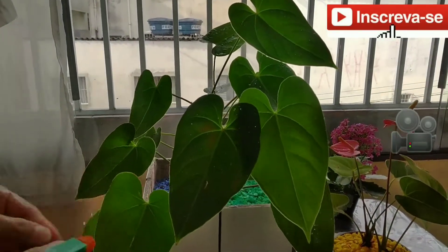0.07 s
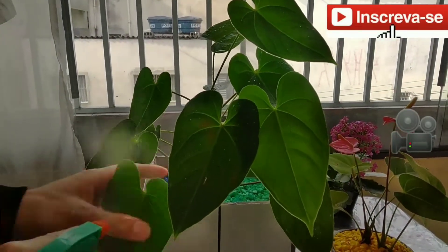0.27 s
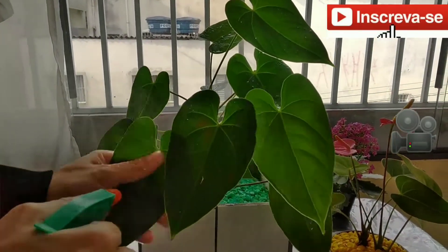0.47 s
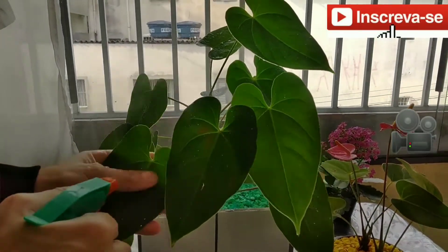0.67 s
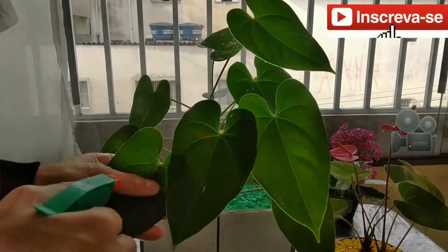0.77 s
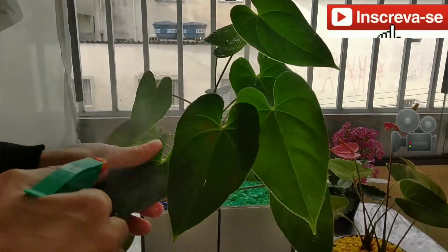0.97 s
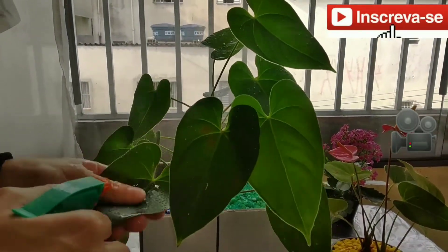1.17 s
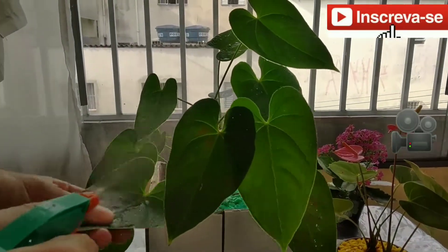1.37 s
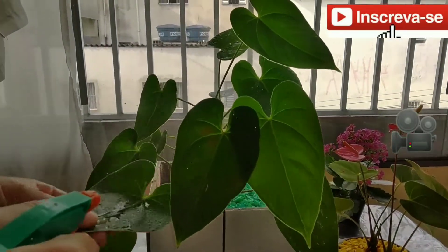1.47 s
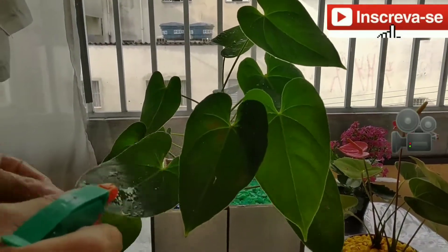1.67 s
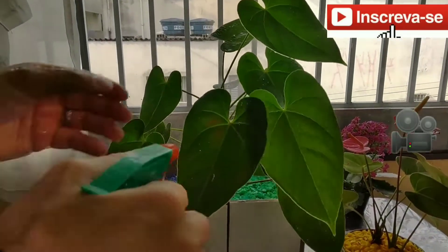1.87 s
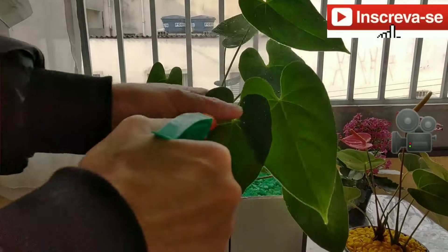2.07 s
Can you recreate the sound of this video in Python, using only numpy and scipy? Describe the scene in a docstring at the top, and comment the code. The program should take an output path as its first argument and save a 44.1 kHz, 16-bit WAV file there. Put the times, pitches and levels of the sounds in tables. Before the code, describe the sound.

A plastic trigger sprayer mists a house plant five times in two seconds, each short airy hiss cut off sharply, with trigger clacks, valve snaps and thin refill fizzes between, close stereo microphone in a small room.

```python
"""In a small room, a plastic trigger bottle mists a house plant five times, heard close up in stereo.
Some squeezes spit first, with a valve snap and a bottle knock made of decaying modes; each hiss is shaped
noise and droplets that swells with the pressure and shuts off. Between squeezes the pump refills with a fizz.
Damped bursts tick, trigger modes clack, narrow noise makes leaf rustles and dull bumps of the hand.
Outdoor noise and one faint sine tone come through the window."""
import sys
import numpy as np
from scipy import signal
from scipy.fft import rfft, irfft
from scipy.io import wavfile

SR = 44100
rng = np.random.default_rng(int(sys.argv[2]) if len(sys.argv) > 2 else 0)


def to_wav(sig):
    """Store sig (one row per channel, or 1-D mono) as 16-bit WAV at the path in sys.argv[1].

    Samples outside -1..1 are clipped; the rate is SR.
    """
    pcm = np.clip(np.atleast_2d(sig), -1, 1) * 32767
    pcm = np.round(pcm).astype(np.int16)
    wavfile.write(sys.argv[1], SR, pcm.T)  # frames by channels


N = 92874
T, HZ = np.arange(N) / SR, np.fft.rfftfreq(N, 1 / SR)


def amp(db):
    """Decibels to gain."""
    return 10 ** (np.asarray(db) / 20)


def unit(x):
    """Scales to rms 1."""
    return x / np.sqrt(np.mean(x ** 2) + 1e-20)


def read(points, hz=HZ):
    """Reads a table on a log-frequency axis."""
    f, value = np.transpose(points)
    return np.interp(np.log(hz + 1), np.log(f + 1), value)


def noise():
    """White noise for mid and side."""
    return rng.standard_normal((2, N))


def colour(x, gain):
    """Gives x a spectrum, at rms 1."""
    return unit(irfft(rfft(x) * gain, N))


def tilted(points, tilt_db):
    """A spectrum leaned by some dB per octave above 100 Hz."""
    octaves = np.log2(np.maximum(HZ, 100) / SR)
    return amp(read(points) + tilt_db * octaves)


def resonance(hz, width_hz):
    """A bell over frequency: 1 at its centre, one half a width away."""
    return 1 / (1 + ((HZ - hz) / width_hz) ** 2)


def droplets():
    """Rushing air mixed with tiny drops of uneven size; the flow flutters."""
    drops_per_s, size_spread_db, drop_share = 9000, 0.5, 0.25  # the share is of power
    flutter_db, flutter_hz = 1.0, 70
    sizes = amp(size_spread_db * np.minimum(rng.exponential(1, N), 4))
    drops = noise() * sizes * (rng.random(N) < drops_per_s / SR)
    flutter = colour(noise()[0], resonance(0, flutter_hz))
    mix = np.sqrt(1 - drop_share) * noise() + np.sqrt(drop_share) * unit(drops)
    return mix * amp(flutter_db * flutter)


def stroke(start, full, end, swell_db, stop_s):
    """A pump stroke opens quickly, swells to full pressure, holds and dies away."""
    open_s = 0.005
    pressure = np.clip((T - start) / max(full - start, 1e-3), 0, 1)
    opening = np.clip((T - start) / open_s, 0, 1)
    closing = np.exp(-np.maximum(T - end, 0) / stop_s)
    return opening * amp(swell_db * (pressure - 1)) * closing


def burst(start, hold_s, decay_s):
    """A sudden start, a short hold and a decay."""
    attack = np.clip((T - start) / 0.0013, 0, 1)
    return attack * np.exp(-np.maximum(T - start - hold_s, 0) / decay_s)


def ring(start, modes):
    """A sharp blow on plastic sets decaying modes going; mid and side ring a quarter cycle apart."""
    strike_s = 0.0001
    since = np.maximum(T - start, 0)
    wave = sum(amp(db - 60 * since / t60) * np.exp(2j * np.pi * hz * since) for hz, db, t60 in modes)
    return np.clip(since / strike_s, 0, 1) * np.array([wave.imag, wave.real])


def background():
    """Steady rumble, a wash whose level drifts, and a faint far tone that swells and fades."""
    # Spectrum of the outdoor noise: f/Hz, level/dB
    outside = [(25, 7), (50, 2.5), (110, 5), (170, 2.5), (350, -1.5), (700, 0.5), (1300, -3), (2200, 1.5),
               (3500, -1.5), (5000, -4), (8000, -12), (11500, -13), (14500, -17)]
    # Gain of the wash above the bass: t/s, gain/dB
    drift = [(0, -45.5), (.15, -43), (.42, -47), (.65, -44.5), (.78, -53.5), (.9, -43), (1.1, -43),
             (1.45, -45), (1.67, -45.5), (1.9, -43), (2.1, -43.5)]
    bass_hz, bass_db = 302, -47
    tone_s, tone_length_s, tone_hz = 1.99, 0.12, 507
    wash = colour(noise(), amp(read(outside)))
    bass = irfft(rfft(wash) / (1 + (HZ / bass_hz) ** 4), N)
    tone_swell = np.exp(-((T - tone_s) / tone_length_s) ** 2)
    tone = 2 * amp(-54) * tone_swell * np.sin(2 * np.pi * tone_hz * T)
    drift_gain = amp(np.interp(T, *np.transpose(drift)))
    return amp(bass_db) * bass + drift_gain * (wash - bass) + tone


def refill(start, full, end, db, swell_db, tilt_db):
    """The trigger springs back and the piston draws liquid: the pump fills with a thin fizz."""
    # Spectrum of the fizz before its tilt: f/Hz, level/dB
    suck = [(80, -56), (250, 5), (450, -0.5), (1200, 0), (2200, 5), (3500, 3.5), (5000, 0.5), (6500, 1.5),
            (8000, 1), (10500, 0.5), (12500, -7), (14500, -19)]
    stop_s = 0.012
    fizz = colour(droplets(), tilted(suck, tilt_db))
    return amp(db) * stroke(start, full, end, swell_db, stop_s) * fizz


def clack(start, db):
    """The trigger hits its stop and its modes ring."""
    # Modes of the struck trigger: f/Hz, level/dB, t60/s
    trigger = [(1140, -13, .012), (3170, -1, .012), (3600, -4, .011), (3980, -4, .01)]
    return amp(db) * ring(start, trigger)


def spray(start, full, end, db, swell_db, nozzle_db, tilt_db, presence_db, spread_db):
    """A broad hiss of mist; the nozzle resonance comes up with the pressure."""
    # Spectrum of the mist before tilt and aim: f/Hz, level/dB
    mist_spectrum = [(60, -12.5), (250, -13.5), (500, -14), (1000, -6.5), (1800, -2), (3000, -0.5),
                     (3700, -1.5), (4500, -0.5), (6300, -5), (7200, -4.5), (7900, -7.5), (8700, -7),
                     (9500, -6), (11500, -6.5), (13000, -12.5), (14500, -18)]
    nozzle_hz, nozzle_width_hz = 2450, 610
    presence_hz, presence_width_hz = 3600, 250  # this band changes with the aim of the nozzle
    shut_s = 0.011
    flow = stroke(start, full, end, swell_db, shut_s)
    mid_side_db = np.array([[presence_db], [presence_db + spread_db]])
    aim = amp(mid_side_db * resonance(presence_hz, presence_width_hz))
    mist = colour(droplets(), tilted(mist_spectrum, tilt_db) * aim)
    nozzle = colour(droplets(), resonance(nozzle_hz, nozzle_width_hz))
    # the squared flow makes the nozzle swell more steeply than the mist
    return amp(db) * (flow * mist + amp(nozzle_db) * flow ** 2 * nozzle)


def bump(centre, length, db, hz):
    """A soft, hollow bump: narrow low noise that swells and fades."""
    width_hz = 45
    return amp(db) * np.exp(-((T - centre) / length) ** 2) * colour(noise(), resonance(hz, width_hz))


def spit(start, db, snap_db, knock_db):
    """A short leak and a bright sputter; then the valve snaps open and the bottle knocks."""
    # Spectrum of the sputter: f/Hz, level/dB
    sputter_spectrum = [(300, -27), (1500, 7), (3500, -8), (6000, 2), (10500, 5.5), (14500, 0)]
    # Modes of the struck valve, then of the bottle: f/Hz, level/dB, t60/s
    valve = [(3140, -6, 0.0048), (8700, -7, 0.0037), (10900, -8, 0.0048), (12600, -9, .002)]
    bottle = [(277, -14.5, 0.021), (756, -5, .02), (995, -9.5, 0.015), (1280, -4.5, 0.01)]
    lead_s, lead_db = 0.011, -11  # the valve leaks just before it opens
    rise_s, hold_s, fade_s, snap_delay_s = 0.00066, 0.0045, 0.0016, 0.003
    since = T - start
    leak = amp(lead_db) * np.exp(-abs(since) / lead_s)
    opening = np.exp(np.minimum(since / rise_s - 1, 0) - np.maximum(since - hold_s, 0) / fade_s)
    sputter = amp(db) * np.maximum(leak, opening) * colour(noise(), amp(read(sputter_spectrum)))
    snap_s = start + snap_delay_s
    return sputter + amp(snap_db) * ring(snap_s, valve) + amp(knock_db) * ring(snap_s, bottle)


def tick(start, db, hz, width_hz, decay_s):
    """A short, heavily damped ring of plastic, made of band noise."""
    return amp(db) * burst(start, 0.00079, decay_s) * colour(noise(), resonance(hz, width_hz))


def rustle(centre, length, db, hz):
    """A soft, narrow rub of leaves under the hand."""
    width_hz = 210
    return amp(db) * np.exp(-((T - centre) / length) ** 2) * colour(droplets(), resonance(hz, width_hz))


def spray_head(x):
    """The plastic head resonates faintly with whatever passes through it."""
    # Narrow resonances of the head: f/Hz, width/Hz, boost/dB
    head = [(2500, 90, 3), (3230, 110, 1), (3510, 35, 1.5), (3730, 60, 4.5), (4300, 120, 1.5)]
    boost_db = sum(db * resonance(hz, width) for hz, width, db in head)
    return irfft(rfft(x) * amp(boost_db), N)


def room(x):
    """A diffuse tail of noise, each band dying at its own speed."""
    # Reverberation time of the room: f/Hz, t60/s
    room_t60 = [(200, 0.84), (700, 0.6), (2000, 0.34), (4500, 0.35), (12000, 0.28)]
    delay_s = 0.003  # silent this long, then fades in over as long again
    hz, t, bands = signal.stft(noise()[:, :SR // 2], SR, nperseg=256)
    decay = amp(-60 * t / read(room_t60, hz)[:, None])
    tail = signal.istft(bands * decay, SR)[1]
    tail = tail * np.clip(T[:tail.shape[1]] / delay_s - 1, 0, 1)
    return signal.fftconvolve(x, tail / np.linalg.norm(tail[0]), axes=1)[:, :N]


def stereo_image(x):
    """Stereo width set band by band, from nearly in phase to nearly opposed.

    Right treble joins the left late and inverted.
    """
    # Stereo width: f/Hz, side minus mid gain/dB
    stereo_width = [(40, 18), (130, -3.5), (400, -4), (750, -9.5), (950, -12), (1150, -33), (1400, -4.5),
                    (1650, 3), (2000, 4.5), (2200, 20), (2400, 32.5), (2600, 12.5), (2750, 6.5),
                    (3000, 0.5), (3400, -10.5), (3750, -7), (4100, -4), (4500, 2.5), (5100, 5),
                    (6200, -2.5), (7700, 4), (9000, -3.5), (10200, 1.5), (11500, -1), (14000, 2.5)]
    # Stereo balance: f/Hz, left minus right gain/dB
    balance = [(100, -2.5), (300, 0), (600, 1), (1150, 1), (1550, -4), (2100, 1), (2600, -0.5),
               (3100, -4.5), (3650, 0), (4300, -3), (5000, -1), (10000, -3)]
    lag_s, link_share, link_hz = 0.000405, 0.24, 5030
    ratio = amp(read(stereo_width))
    mid, side = rfft(x) * np.array([np.ones_like(ratio), ratio]) / np.sqrt(1 + ratio ** 2)
    left, right = mid + side, mid - side
    link = link_share * (1 - 1 / (1 + (HZ / link_hz) ** 8))
    late_right = right * np.exp(-2j * np.pi * HZ * lag_s)
    left = np.sqrt(1 - link ** 2) * left - link * late_right
    lean = amp(read(balance) / 2)
    return irfft(np.array([left * lean, right / lean]), N)


def scene():
    """The bottle, the hand and the leaves in the room, over the background."""
    # Pump refills: start t/s, full t/s, end t/s, level/dB, swell/dB, tilt/(dB per octave)
    refills = [(-.02, 0, 0.011, -39, -5, -1), (0.457, 0.479, 0.5, -33.5, 13, 0.9),
               (0.79, 0.809, 0.85, -37, 2.5, 0.8), (1.097, 1.141, 1.189, -36.5, 22, 1),
               (1.576, 1.601, 1.593, -39, 19, 0), (1.688, 1.755, 1.86, -43.5, 9, -1.1)]
    # Trigger clacks: t/s, level/dB
    clacks = [(0.054, -31), (0.0548, -26)]
    # Squeezes: start t/s, full pressure t/s, shut-off t/s, level/dB, swell/dB, nozzle resonance/dB,
    # tilt/(dB per octave), presence/dB, side minus mid of that presence/dB
    sprays = [(0.11, 0.238, 0.259, -23.8, 25, -11, -.5, 1, 0),
              (0.543, .588, 0.6236, -26.2, 7, -4, 0, 1.5, -1),
              (0.878, 0.94, 0.971, -27.3, 7.5, -2, 0.5, -0.5, 0),
              (1.23, 1.315, 1.3764, -34.3, 2, -31, -1, 1, -1),
              (1.915, 1.98, 2.0006, -26.2, 16, -13, -0.73, -5, 8)]
    # Dull bumps of the hand on bottle and pot: centre t/s, length/s, level/dB, f/Hz
    bumps = [(.335, 0.018, -54, 160), (0.484, .04, -54, 217), (0.58, 0.04, -55, 225),
             (0.82, 0.05, -55, 185), (0.905, 0.03, -51, 256), (1.252, 0.06, -57, 255)]
    # Spits as the valve opens: t/s, sputter/dB, snap/dB, bottle knock/dB
    spits = [(0.5371, -26, -29, -22.5), (0.8738, -26.5, -16.5, -27.5), (1.2315, -31.5, -25, -31)]
    # Plastic ticks: t/s, level/dB, f/Hz, width/Hz, decay/s
    ticks = [(1.058, -29.5, 6150, 660, 0.001), (1.058, -34.5, 3730, 1000, 0.0019),
             (0.54, -37, 4300, 7000, 0.008), (0.747, -43.5, 2600, 1500, 0.0037)]
    # Leaf rustles: centre t/s, length/s, level/dB, f/Hz
    rustles = [(1.501, 0.038, -47.5, 1170), (1.586, 0.022, -45, 2070), (1.638, 0.014, -45, 1360)]
    room_db = -8.5
    near = spray_head(sum(refill(*row) for row in refills) + sum(spray(*row) for row in sprays))
    for source, table in [(clack, clacks), (bump, bumps), (spit, spits), (tick, ticks), (rustle, rustles)]:
        near = near + sum(source(*row) for row in table)
    return stereo_image(near + amp(room_db) * room(near) + background())


def record(dry):
    """The recorder's band limit: a steep low-pass."""
    edge_hz = 14400
    low_pass = signal.firwin(301, edge_hz, window=("kaiser", 8), fs=SR)
    return signal.oaconvolve(dry, low_pass[None], "same")


dry = scene()
out = record(dry)
to_wav(out)
```